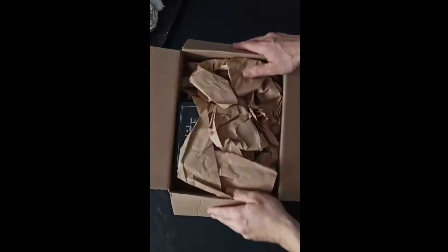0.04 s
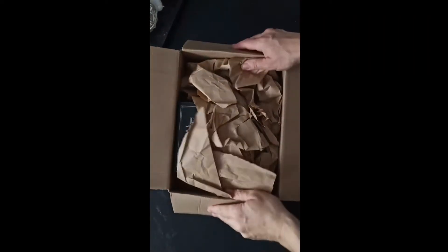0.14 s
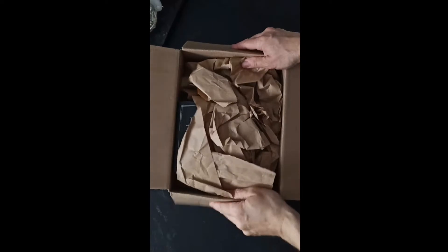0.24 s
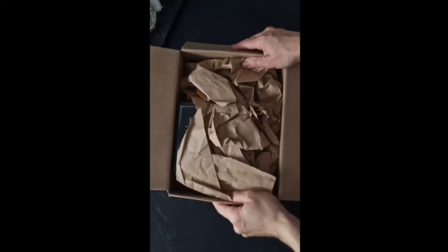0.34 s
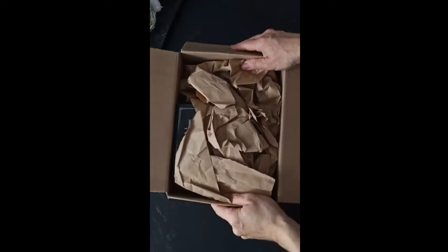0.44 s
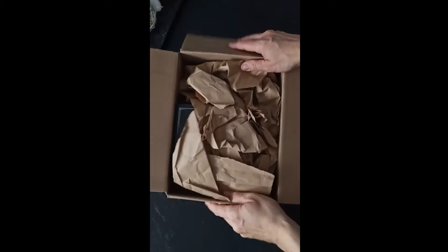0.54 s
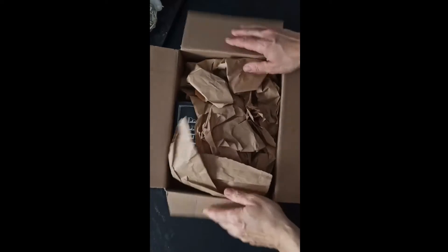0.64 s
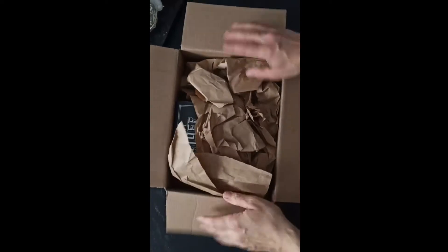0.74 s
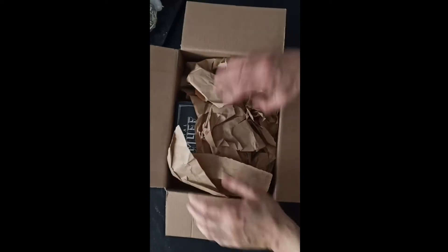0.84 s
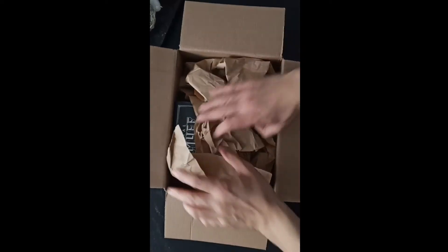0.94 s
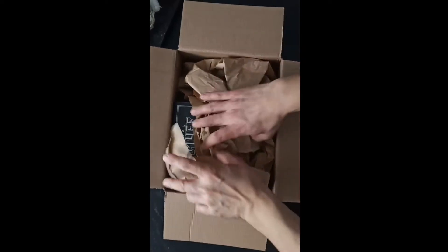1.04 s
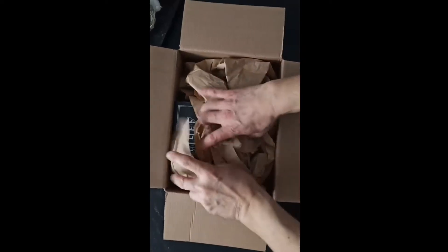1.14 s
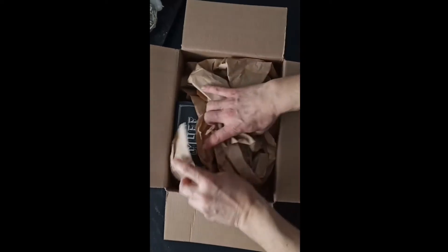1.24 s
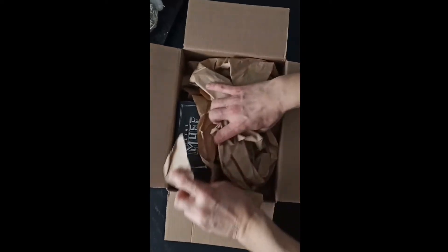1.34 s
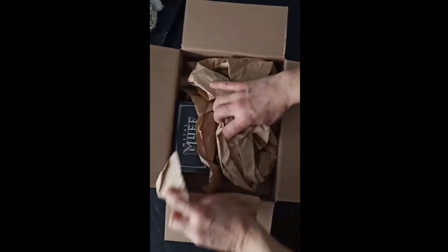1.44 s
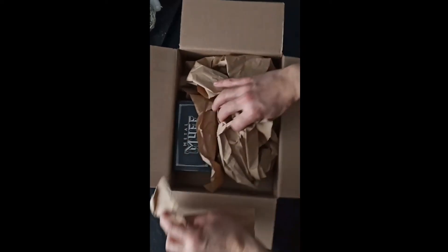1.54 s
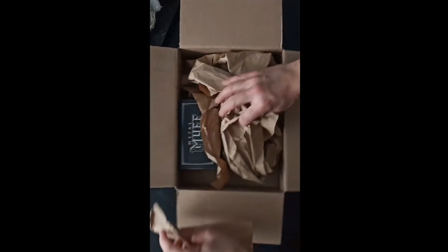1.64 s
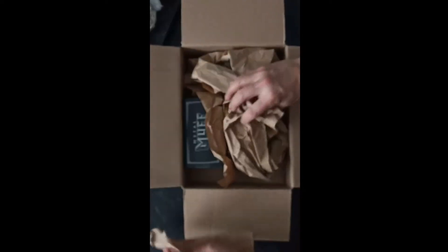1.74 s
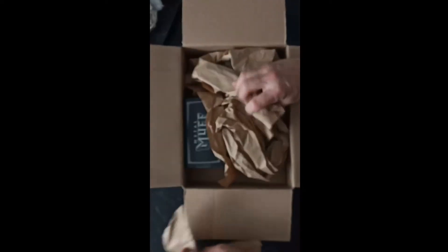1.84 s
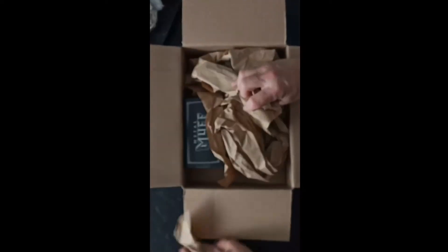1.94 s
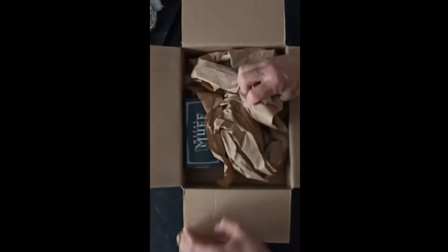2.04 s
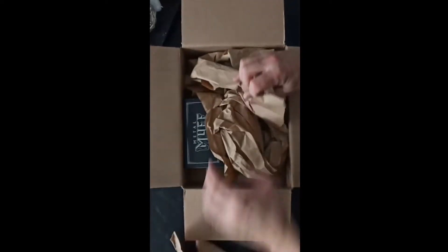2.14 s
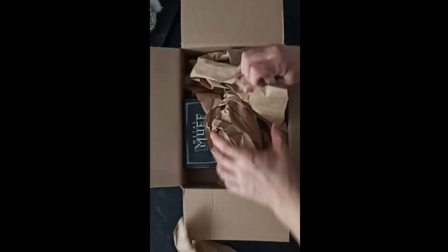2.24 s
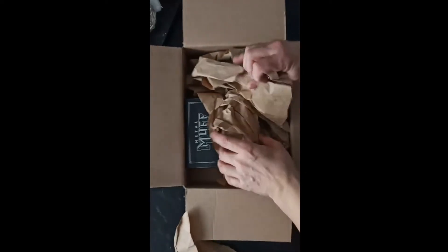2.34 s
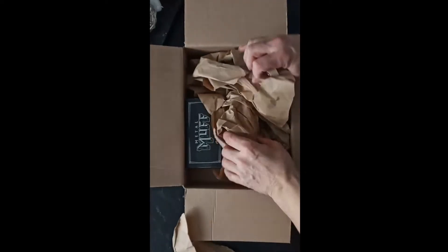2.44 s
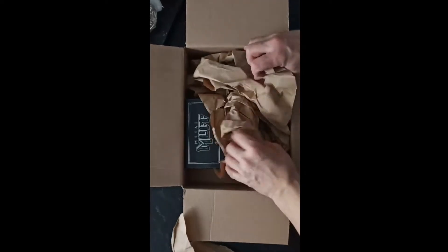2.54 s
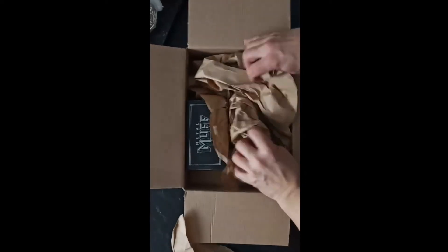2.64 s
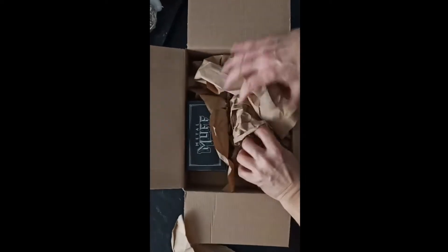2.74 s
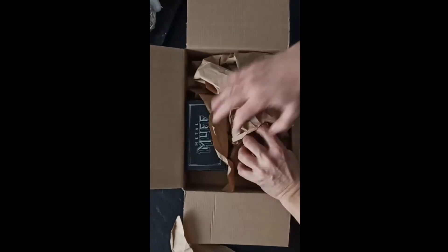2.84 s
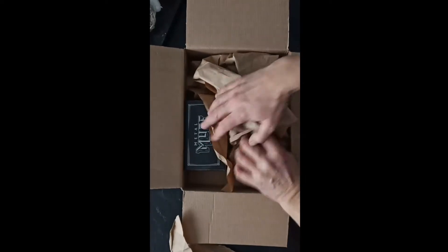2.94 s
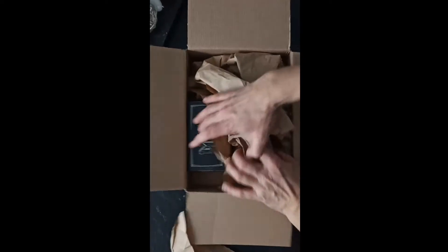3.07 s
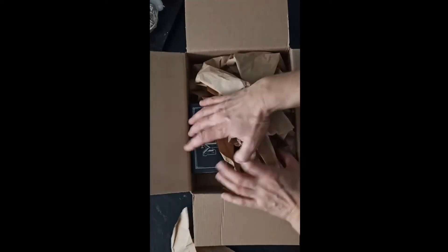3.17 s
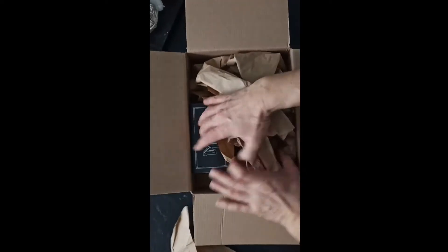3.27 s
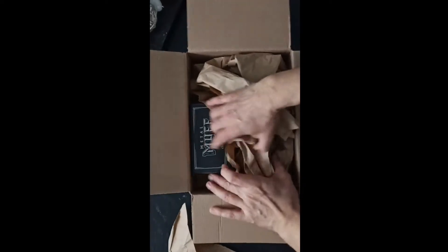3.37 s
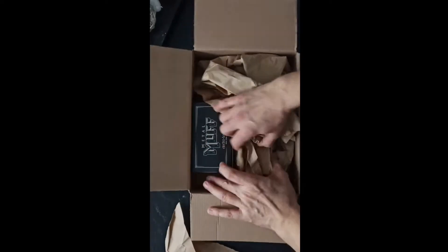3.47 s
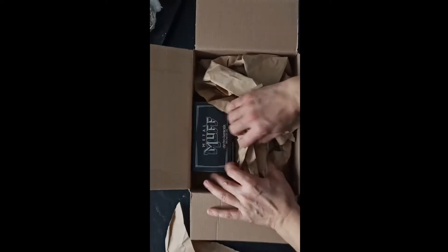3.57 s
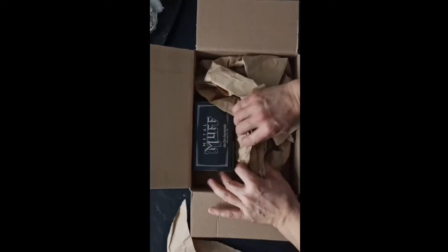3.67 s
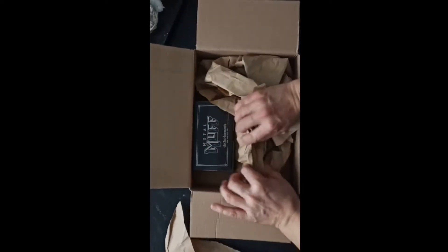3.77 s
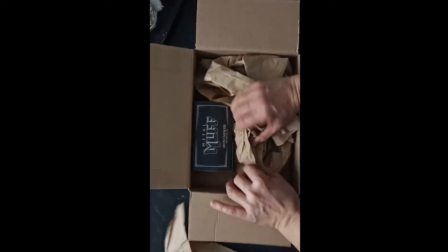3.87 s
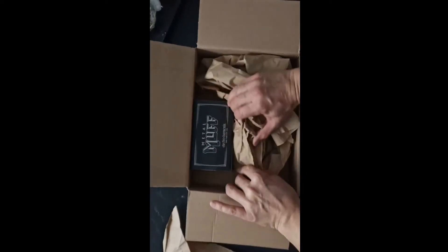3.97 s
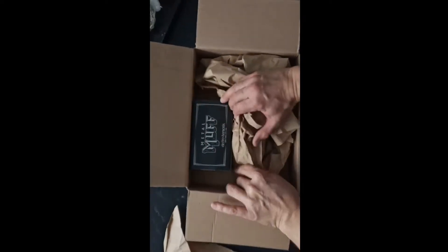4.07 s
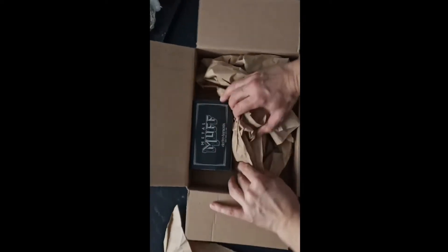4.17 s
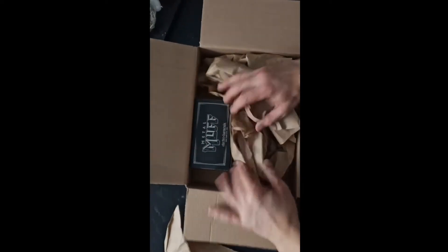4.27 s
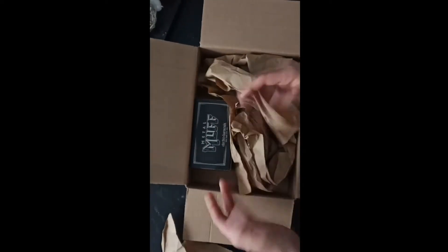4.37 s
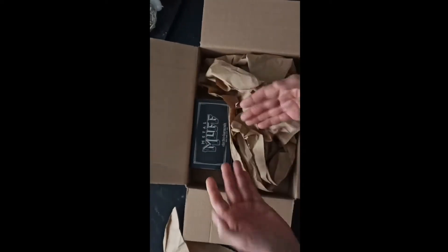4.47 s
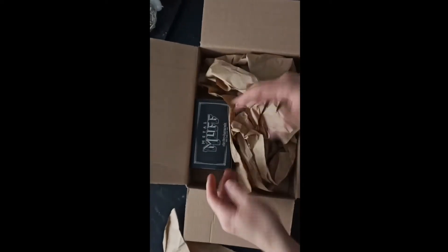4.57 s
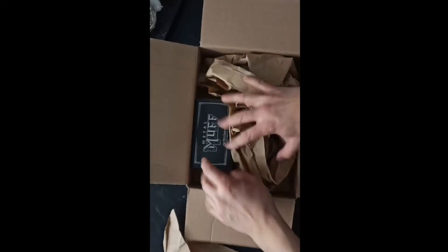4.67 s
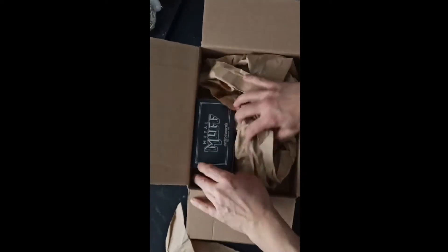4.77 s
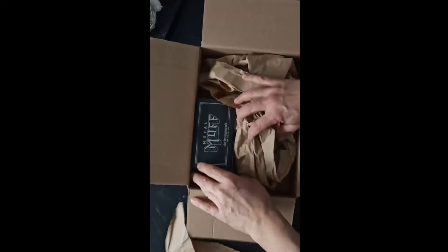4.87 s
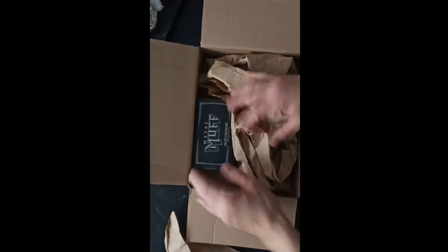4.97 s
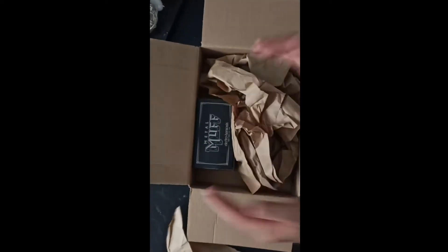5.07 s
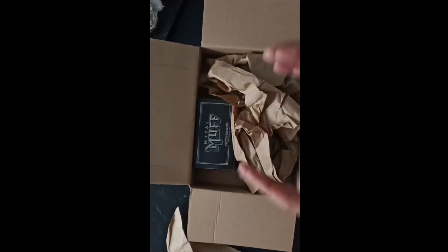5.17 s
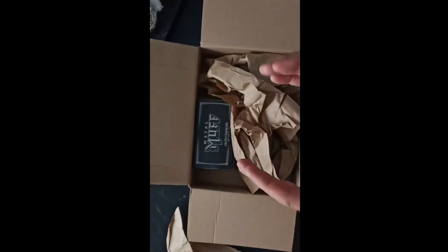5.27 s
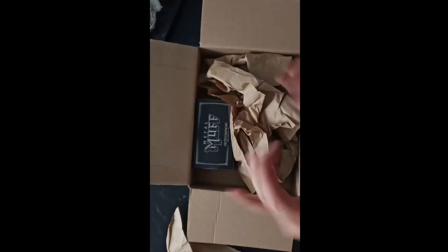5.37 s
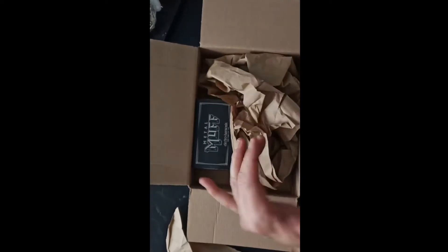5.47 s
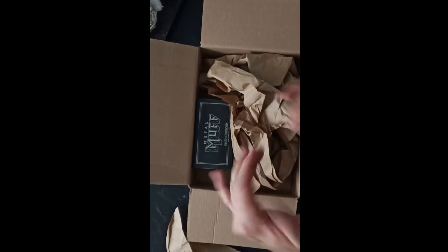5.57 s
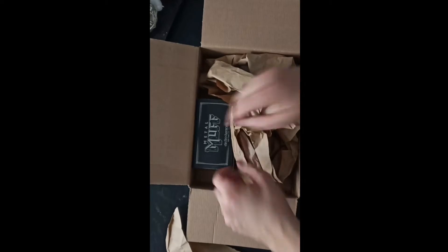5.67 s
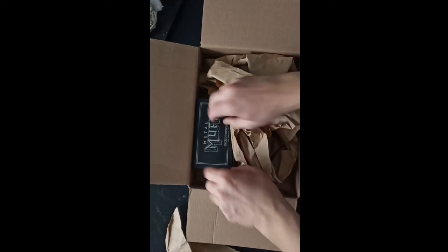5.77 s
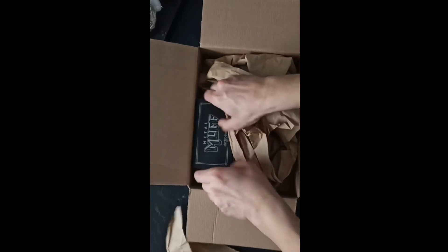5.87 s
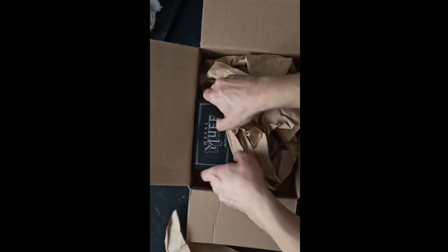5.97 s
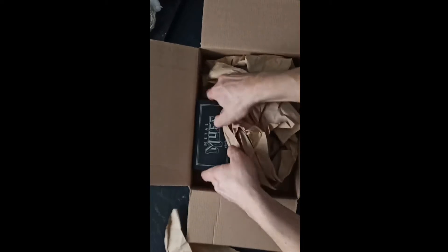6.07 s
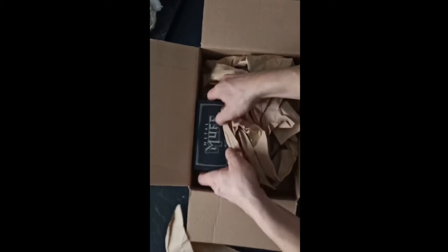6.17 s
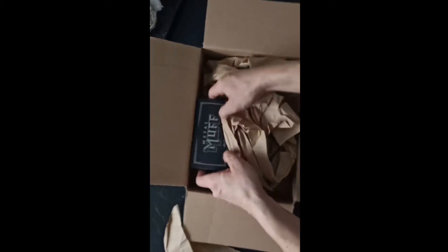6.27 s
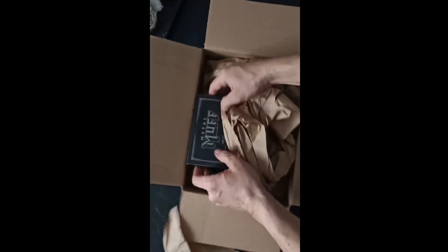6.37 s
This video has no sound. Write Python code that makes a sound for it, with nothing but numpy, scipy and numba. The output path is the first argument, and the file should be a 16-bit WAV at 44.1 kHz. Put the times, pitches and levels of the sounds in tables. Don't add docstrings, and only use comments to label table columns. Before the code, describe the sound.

Already under way at 0 s, hands rustle stiff crumpled paper in a cardboard box. Crackling swells from 0.15 s, with a sharp snap near 0.44 and the strongest hollow thump with a loud grab at about 0.5. It eases, a box bump falls at 0.85, and rustling stops for a moment around 1.0-1.15. A long rummage follows from 1.2: steady crinkling, a busy cluster of snaps and knocks at 2.0-2.4, more at 2.85, a stiff fold popping at 3.2, a dull thump at 3.35, and bright crackles near 4.1. It thins briefly around 4.7, swells again at 4.9-5.15, then fades by 5.3. A faint click at 5.37 precedes near silence with slight hush. From 5.98 rustling resumes, growing into crisp creases around 6.25-6.35. Close phone microphone, small room, noise suppression trimming the tails.

```python
import sys
import numpy as np
from scipy import signal
from scipy.fft import rfft, irfft, next_fast_len
from scipy.io import wavfile
from scipy.ndimage import uniform_filter1d
from numba import njit

SR = 44100
rng = np.random.default_rng(int(sys.argv[2]) if len(sys.argv) > 2 else 0)


def bounce(signal):
    frames = np.transpose(np.atleast_2d(signal))
    limited = np.clip(frames, -1, 1)
    pcm = np.round(limited * 32767).astype(np.int16)
    wavfile.write(sys.argv[1], SR, pcm)


def attenuation_scalar(level_db):
    decades = np.asarray(level_db, float) / 20
    return 10 ** decades


N = 282681


def unit(x):
    return x / np.sqrt(np.mean(x ** 2))


def white():
    return rng.standard_normal(N)


def colour(x, points):
    hz, gain_db = np.transpose(points)
    size = next_fast_len(len(x))
    bin_hz = np.maximum(np.arange(size // 2 + 1) * SR / size, 1)
    gain = attenuation_scalar(np.interp(np.log(bin_hz), np.log(hz), gain_db))
    return irfft(rfft(x, size) * gain, size)[:len(x)]


def band(x, lo_hz, hi_hz):
    return signal.sosfilt(signal.butter(2, [lo_hz, hi_hz], "band", fs=SR, output="sos"), x)


def walk(rate_hz):
    hold = int(SR / rate_hz)
    steps = np.repeat(rng.standard_normal(N // hold + 1), hold)
    return 1.3 * uniform_filter1d(steps, hold)[:N]


@njit
def bursts(start_s, peak, hz, ring_s, push_s, direct, noise):
    out, buf = np.zeros(len(noise)), np.zeros(16384)
    for e in range(len(start_s)):
        i0 = int(start_s[e] * SR)
        n = min(int((1.5 * push_s[e] + ring_s[e]) * SR) + 8, 16384, len(out) - i0)
        pole = np.exp(2j * np.pi * hz[e] / SR - np.log(1000.) / (ring_s[e] * SR))
        z, top, norm = 0j, 1e-12, np.sqrt(1 - abs(pole) ** 2)
        for i in range(n):
            u = i / (push_s[e] * SR)
            push = noise[i0 + i] * min(1., 5 * u + .2) * np.exp(-1.5 * u ** 3)
            z = z * pole + push
            buf[i] = 2 * norm * z.imag + direct[e] * push
            top = max(top, abs(buf[i]))
        for i in range(n):
            out[i0 + i] += peak[e] * buf[i] / top
    return out


# touch_s, lift_s
TOUCHES = [
    (-.1, .975),
    (1.17, 5.29),
    (5.975, 6.5),
]
# peak_s, level_db, swell_s_per_10db, fade_s_per_10db
GRABS = [(-.001, -38, .1, .11), (.03, -38, .03, .1), (.168, -25.5, .055, .38), (.261, -28, .4, .12),
         (.455, -33.5, .2, .3), (.491, -23, .032, .068), (.819, -35.5, .18, .08), (1.253, -30.5, .038, .9),
         (1.374, -31, .9, .2), (1.522, -31.5, .056, .9), (1.637, -30.5, .9, .23), (2.071, -29.5, .2, .15),
         (2.286, -26, .008, .034), (2.37, -27, .047, .13), (2.55, -32, .19, .9), (2.85, -27.5, .7, .19),
         (3.235, -32.5, .13, .16), (3.519, -30, .11, 1.5), (3.813, -28, .45, .11),
         (3.949, -29.5, .027, .044), (4.077, -25.5, .078, .18), (4.474, -29, .21, .041),
         (4.591, -36, .4, .073), (4.709, -42, .027, .15), (4.9, -26, .013, .9), (4.988, -27, .9, .066),
         (5.147, -27.5, .04, .038), (5.276, -45.5, .06, .03), (5.985, -35.5, .014, 1.7),
         (6.179, -29, .03, .3), (6.262, -26, .28, .13)]
# time_s, crisp_db (sheet treble), weight_db (on the box)
STANCE = [(.2, -8, -4), (.47, -6, -5), (.57, -15, -1), (.84, -3, -1), (.95, -30, 3), (1.18, -6, -17),
          (1.3, -6.5, -6), (1.55, -7, -10), (1.85, -4, -10), (2.15, -8, -9), (3.2, -7, -6), (4.68, -7, -6),
          (4.72, -5, -18), (4.79, -4, -12), (4.82, -4, -26), (4.86, -4, -20), (4.95, -7, -5),
          (5.27, -16, -9), (5.97, -4, -9), (6.2, -8, -6)]


def hands():
    land_db_per_s, lift_db_per_s, usual_db = 4000, 550, -33
    t = np.arange(N) / SR
    peak_s, level_db, swell_s, fade_s = np.transpose(GRABS)
    last = np.searchsorted(peak_s, t, "right") - 1
    ahead = np.minimum(last + 1, len(peak_s) - 1)
    rising_db = level_db[ahead] - 10 * (peak_s[ahead] - t) / swell_s[ahead]
    rising_db = np.where(ahead > last, rising_db, -99)
    falling_db = level_db[last] - 10 * (t - peak_s[last]) / fade_s[last]
    grip_db = np.maximum(falling_db, rising_db)
    away_db = np.max([
        np.minimum(np.minimum(land_db_per_s * (t - touch_s), lift_db_per_s * (lift_s - t)), 0)
        for touch_s, lift_s in TOUCHES], axis=0)
    time_s, crisp_db, weight_db = np.transpose(STANCE)
    effort_db = np.clip(grip_db - usual_db, -15, 15)
    crisp_db = np.interp(t, time_s, crisp_db) + .03 * effort_db
    weight_db = np.interp(t, time_s, weight_db) - .2 * effort_db
    return np.maximum(grip_db + away_db, -99), crisp_db, weight_db


# time_s, level_db (re rustle)
ROCKING = [(.3, -20), (.6, -10), (1, -6), (1.25, -20), (1.8, -28), (2.2, -20), (2.9, -18), (3, -34),
           (4.4, -36), (4.5, -16), (5.3, -16), (6, -28)]


def rocking():
    level_db = np.interp(np.arange(N) / SR, *np.transpose(ROCKING))
    return unit(band(white(), 45, 170)) * attenuation_scalar(level_db + 4 * walk(15))


def paper(level_db, crisp_db, weight_db):
    when, rarity, pitch, length = rng.random((6000, 4)).T
    size_db = np.minimum(-3.4 * np.log(rarity), 13.5)
    hz = 900 * (9000 / 900) ** pitch
    push_s = 0.00068 + 0.0057 * length ** 2
    hail = bursts(when * N / SR, attenuation_scalar(size_db), hz, 3.2 / hz, push_s, 1.04 + 0 * hz, white())
    rub = white() * attenuation_scalar(4.5 * walk(80))
    sheet = (unit(hail) + .35 * rub) * attenuation_scalar(0.73 * walk(22))
    mid = unit(band(sheet, 800, 7640))
    top = unit(band(sheet, 5730, 16000))
    panels = unit(band(sheet + 3.0 * white(), 230, 1000))
    low = attenuation_scalar(weight_db) * rocking() + attenuation_scalar(weight_db + 0.54) * panels
    return attenuation_scalar(level_db - 0.5) * (mid + attenuation_scalar(crisp_db + 5) * top + low)


# start_s, peak_db, ring_hz, treble_peak_db, burst_ms
SNAPS = [(.0746, -11, 3840, -22, 3), (.1731, -10, 6560, -13, 4), (.3095, -19.5, 1460, -18, 4.5),
         (.371, -13.5, 1380, -19, 3.9), (.4094, -15, 6130, -15, 2.3), (.4368, -4, 4020, -11, 1.9),
         (.4872, -6, 1588, -17, 11), (.5416, -11.5, 1210, -33, 7.9), (.6758, -19.5, 5470, -26, 1.3),
         (.7206, -13, 3560, -31.5, 2.0), (1.9631, -22, 6720, -17.5, 2.9), (2.0744, -9.5, 6290, -20.5, 5.4),
         (2.1456, -10.5, 5640, -19, 2.6), (2.2359, -11.5, 3500, -19, 4.2), (2.362, -10, 3270, -17.5, 5),
         (3.1516, -17.5, 6760, -23.5, 9.5), (3.2225, -16, 3320, -17, 3.2), (3.5404, -11, 4780, -26.5, 2.1),
         (4.0708, -13.5, 5230, -16, 9), (4.4524, -13.5, 4220, -17, 9), (4.6964, -21.5, 6680, -24.5, 6.9),
         (5.113, -16, 5720, -19, 3), (5.1895, -15, 5020, -17, 3.1), (5.3744, -44, 5050, -34, 4)]
# start_s, peak_db, ring_hz, treble_peak_db
MORE_SNAPS = [(.1513, -14, 2575, -29), (.2617, -12.5, 4130, -18.5), (.2898, -14, 1460, -19.5),
              (.379, -14, 5540, -20.5), (.811, -22, 7160, -22), (1.2439, -22, 6820, -23),
              (1.308, -13.5, 2330, -18), (1.5715, -16, 4490, -20), (1.6936, -16, 4100, -20.5),
              (1.82, -16, 3960, -21.5), (2.0077, -15.5, 6590, -18), (2.0259, -13.5, 3750, -31.5),
              (2.281, -13.5, 4820, -18), (2.5431, -17, 5930, -20), (2.7359, -13.5, 6600, -16.5),
              (2.85, -12, 6590, -15.5), (2.8819, -10, 6500, -18), (2.9693, -17.5, 3090, -19.5),
              (3.6501, -15, 1210, -18.5), (3.7888, -12, 6430, -15.5), (4.0016, -14, 3960, -26),
              (4.1149, -12, 3100, -12), (4.2597, -18, 4700, -24), (4.5477, -17, 3780, -27),
              (4.5895, -15.5, 3600, -29), (4.9776, -15, 5170, -16), (5.141, -11.5, 3320, -15.5),
              (6.0358, -23, 4740, -26), (6.2547, -10.5, 1184, -16), (6.3395, -14, 3880, -26)]
# start_s, peak_db, ring_hz
TICKS = [(3.1981, -23, 5370), (2.2765, -19, 6000), (2.2905, -14, 5500), (2.2955, -16, 3500),
         (2.3755, -16, 6000), (2.3885, -17, 1500), (.4935, -13, 1300), (2.1515, -18, 1400),
         (1.2271, -23, 6320), (1.2815, -20, 6580), (1.3663, -18, 4250), (1.513, -23, 6660),
         (2.8305, -18, 6200), (3.1313, -30, 3500), (3.2066, -17, 1800), (4.2472, -24, 1770),
         (4.8586, -36, 600), (.2402, -16, 900), (.1246, -20, 3680), (.2041, -15, 4680), (.6, -27, 2024),
         (1.3233, -17, 5600), (1.3804, -16.5, 7020), (1.4252, -18, 6200), (1.464, -21, 6550),
         (1.5252, -17, 3770), (1.6172, -16.5, 4020), (1.6426, -17, 6330), (1.725, -20, 6760),
         (1.8707, -21, 3860), (2.0582, -15, 7060), (2.3978, -15, 4110), (2.5028, -20, 6120),
         (2.6243, -17, 4600), (2.7202, -17, 6240), (3.0063, -20.5, 4010), (3.059, -21, 5430),
         (3.453, -19, 4010), (3.5229, -16, 6160), (3.8144, -17, 3960), (3.9376, -18.5, 6700),
         (4.2051, -15.5, 4040), (4.4724, -13.5, 2850), (4.6368, -22.5, 5640), (5.0078, -14, 4180),
         (5.2567, -25, 4820), (6.1669, -16, 1210), (6.3002, -12, 6250)]
# start_s, peak_db, ring_hz
MORE_TICKS = [(0.0278, -25, 1310), (0.1082, -17, 3450), (0.2104, -13, 5080), (0.2524, -11, 5580),
              (0.6254, -25, 2010), (0.7951, -17, 3480), (0.827, -20, 1500), (0.8555, -22, 1630),
              (1.1912, -32, 3240), (1.6003, -13, 3260), (1.9919, -14, 6490), (2.3311, -17, 2780),
              (2.4414, -19, 1490), (2.4783, -21, 1290), (2.5955, -18, 1640), (2.6424, -13, 6450),
              (3.0839, -23, 3080), (3.3657, -22, 5770), (3.4181, -22, 3260), (3.5104, -13, 6690),
              (3.5578, -15, 5770), (3.5793, -15, 1430), (3.6114, -13, 1770), (3.6795, -15, 1630),
              (3.7209, -15, 1610), (3.8616, -17, 3970), (4.1774, -14, 6470), (4.2288, -17, 4240),
              (4.2941, -16, 3640), (4.3321, -19, 3430), (4.4039, -17, 1500), (4.6674, -28, 6770),
              (4.7144, -27, 6200), (4.7571, -26, 1310), (4.7935, -33, 4880), (4.8194, -33, 5900),
              (4.8888, -16, 6150), (4.9204, -13, 6040), (5.0264, -14, 1660), (6.0766, -20, 5090),
              (6.0945, -17, 6380), (6.135, -21, 4180), (6.1759, -16, 2020), (6.1998, -14, 1460),
              (6.2674, -11, 1800), (6.3464, -10, 1460)]


def snaps():
    fold_ms, crinkle_db, small_treble_db = 3.7, -4, -5
    small = list(TICKS) + [(s, db + crinkle_db, hz) for s, db, hz in MORE_TICKS]
    folds = [tuple(row) + (fold_ms,) for row in MORE_SNAPS]
    small = [(s, db, hz, db + small_treble_db, fold_ms) for s, db, hz in small]
    start_s, peak_db, hz, treble_db, burst_ms = np.vstack([SNAPS, folds, small]).T.copy()
    push_s = 0.98 * np.clip(burst_ms, .3, 12) / 1000
    tearing = white() * attenuation_scalar(3 * walk(1500))
    facet = band(band(tearing, 510, 7500), 460, 9800)
    hiss = band(tearing, 8500, 17000)
    body = bursts(start_s, attenuation_scalar(peak_db - 3.5), hz, 5.5 / hz, push_s, 1.4 + 0 * hz, facet)
    edge = bursts(start_s, attenuation_scalar(treble_db + 5.5), 14800 + 0 * hz, .0004 + 0 * hz,
                  .9 * push_s, 1.2 + 0 * hz, hiss)
    return body + edge


# start_s, peak_db, wall_hz, ring_s, table_thud_db
THUMPS = [(0.146, -22, 359, 0.025, -40), (0.496, -6.5, 312, 0.013, -34.5), (0.851, -14.5, 330, 0.035, -36),
          (1.301, -24, 765, 0.049, -54), (1.567, -23, 343, 0.016, -75), (1.629, -26, 393, 0.048, -45.5),
          (1.998, -27, 564, 0.067, -66.5), (2.145, -15.5, 356, 0.041, -40), (2.279, -24, 340, 0.05, -42.5),
          (2.536, -19.5, 346, 0.023, -47), (2.857, -23.5, 620, 0.024, -43.5),
          (3.347, -14.5, 347, 0.05, -38), (3.8, -25, 670, 0.036, -57), (3.918, -30, 210, 0.03, -47),
          (4.104, -19, 274, 0.03, -58), (4.47, -23.5, 683, 0.045, -55.5), (4.858, -42, 148, 0.047, -47),
          (5.143, -22, 550, 0.03, -50), (5.385, -47, 620, 0.06, -90), (5.988, -32.5, 154, 0.03, -52.5),
          (6.166, -25, 800, 0.015, -60), (6.174, -25, 200, 0.03, -45), (0.767, -29, 258, 0.03, -55),
          (2.351, -28, 240, 0.03, -55), (4.026, -30, 215, 0.03, -55), (4.977, -27, 371, 0.03, -55)]
# mode_hz, width_hz, gain_db
BOX = [(144, 33, 8), (288, 17, -26), (315, 74, -13), (417, 74, -4), (674, 53, -1)]


def thumps():
    start_s, peak_db, hz, ring_s, thud_db = np.transpose(THUMPS)
    flat = 0 * hz
    noise = band(band(white(), 90, 900), 90, 900)
    direct = 1.8 * np.minimum(400 / hz, 1) ** 2
    ring_s = np.clip(ring_s, .004, .3)
    wall = bursts(start_s + 0.0025, attenuation_scalar(peak_db - 3), hz, ring_s, 0.005 + flat, direct, noise)
    shudder = bursts(start_s + 0.0067, attenuation_scalar(thud_db + 10), hz, .005 + flat,
                     1.96 * ring_s, 1.5 + flat, band(noise, 100, 500))
    cavity = sum(attenuation_scalar(gain_db) * band(wall, mode_hz - width_hz / 2, mode_hz + width_hz / 2)
                 for mode_hz, width_hz, gain_db in BOX)
    thud = bursts(start_s + 0.0024, attenuation_scalar(thud_db + 7), 135 + flat, 0.038 + flat,
                  .01 + flat, 1.9 + flat, band(noise, 60, 190))
    return band(wall + shudder + attenuation_scalar(-8) * cavity + thud, 90, 1500)


# mode_hz, width_hz, level_db
POP_MODES = [(740, 140, 4), (1400, 200, -12), (1840, 250, -11), (2560, 250, -14), (3300, 280, -4),
             (6290, 200, -19)]
# mode_hz, width_hz, level_db
CLICK_MODES = [(2320, 200, -12), (3390, 200, -11), (3810, 250, -9), (4500, 200, -3), (5110, 250, -7),
               (5960, 200, -11)]


def flick(start_s, peak_db, modes):
    hz, width_hz, level_db = np.transpose(modes).copy()
    rung = bursts(start_s + 0 * hz, attenuation_scalar(peak_db + level_db), hz, 2.4 / width_hz,
                  .0015 + 0 * hz, 0 * hz, white())
    return band(rung, .55 * hz[0], 12000)


def pops():
    return flick(3.2222, -9, POP_MODES) + flick(5.3746, -31, CLICK_MODES)


# band_hz, t60_s
ROOM_T60 = [(150, 0.28), (500, 0.37), (2000, 0.4), (6000, .26), (12000, 0.23)]


def room(x):
    t = np.arange(SR // 2) / SR
    band_hz, t60_s = np.transpose(ROOM_T60)
    spot = np.arange(N) / (.06 * SR)
    wet = 0
    for k in range(4):
        tail = 0
        for hz in 100 * 2 ** np.arange(0, 7.6, .5):
            decay_s = np.interp(np.log(hz), np.log(band_hz), t60_s)
            diffuse = band(rng.standard_normal(len(t)), hz / 1.21, hz * 1.19)
            tail = tail + diffuse * attenuation_scalar(-60 * t / decay_s)
        tail = tail * np.clip((t - .007) / 0.001, .5, 1) * (t > .001)
        share = np.clip(1 - abs((spot - k) % 4 - 1), 0, 1)
        wet = wet + signal.fftconvolve(x * np.sqrt(share), tail / np.sqrt(np.sum(tail ** 2)))[:N]
    return x + attenuation_scalar(-7) * wet


def scene():
    return room(paper(*hands()) + snaps() + pops() + thumps())[None]


# hz, level_db_per_bin
LEARNT = [(100, -66), (330, -80), (650, -70), (1100, -79), (2300, -84), (3600, -78), (4600, -85),
          (6500, -81), (12000, -87)]


def suppress(x):
    f, _, z = signal.stft(x, SR, nperseg=512)
    power = uniform_filter1d(uniform_filter1d(abs(z) ** 2, size=5, axis=1), size=3, axis=0)
    hz, level_db = np.transpose(LEARNT)
    patchy_db = 3 * np.repeat(rng.standard_normal(len(f)), 4)[:len(f)]
    learnt_db = np.interp(np.log(f + 1), np.log(hz), level_db) + patchy_db
    learnt = attenuation_scalar(learnt_db)[:, None] ** 2
    gain = np.clip(power / (power + learnt), attenuation_scalar(-30), 1) ** 2
    return signal.istft(z * gain, SR, nperseg=512)[1][:N]


# hz, level_db_per_hz
HUSH = [(18, -42), (30, -12), (43, -15), (415, -3), (449, 0), (512, -5), (913, -5), (5170, -11),
        (8520, -22), (13300, -23), (14800, -11), (16000, -19)]
# time_s, level_db, extra_db (outside 1.2-2.7 kHz)
HUSH_LEAK = [(5.3, -83, -2), (5.54, -79, -5), (5.555, -76.5, 0), (5.815, -76.5, 0), (5.825, -77, -6)]


def leaked_hush():
    t = np.arange(N) / SR
    time_s, level_db, extra_db = np.transpose(HUSH_LEAK)
    hush = unit(colour(white(), HUSH))
    outer = colour(hush, [(1100, 0), (1300, -40), (2600, -40), (2900, 0)])
    hush = hush - outer + outer * attenuation_scalar(np.interp(t, time_s, extra_db))
    return hush * attenuation_scalar(np.interp(t, time_s, level_db))


# hz, gain_db
MIC = [(30, -39.5), (60, -7.5), (130, -3), (300, -1), (2500, -1), (6500, 9.5), (7100, 4.5), (8200, -3.5),
       (10300, 2), (12000, -7.5), (13600, -10.5), (15000, 0.5), (16300, -36)]


def low_pass(x):
    return signal.sosfilt(signal.butter(12, 16810, fs=SR, output="sos"), x)


def record(dry):
    rumble = attenuation_scalar(-102) * unit(band(white(), 30, 130))
    offset = -.0001
    mix = suppress(colour(dry[0], MIC)) + leaked_hush() + rumble + offset
    return low_pass(mix[None])


dry = scene()
out = record(dry)
bounce(out)
```